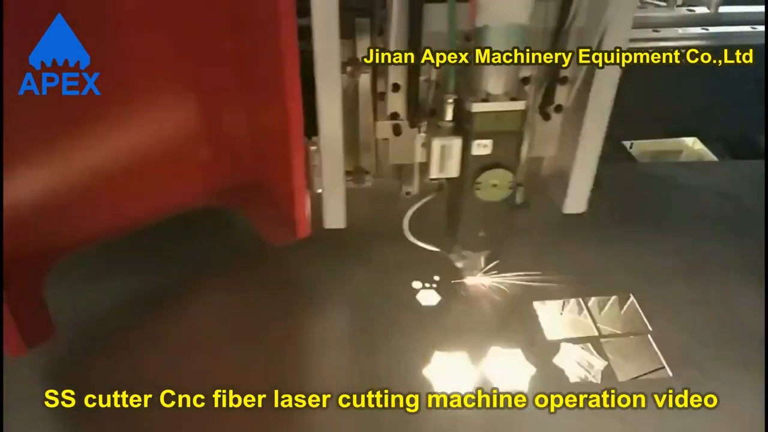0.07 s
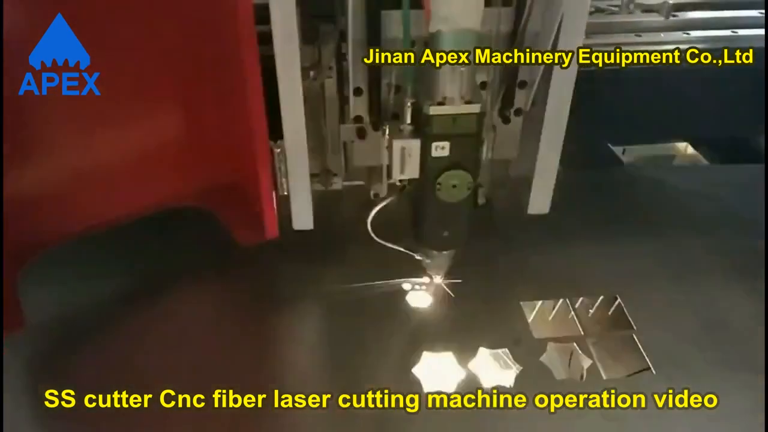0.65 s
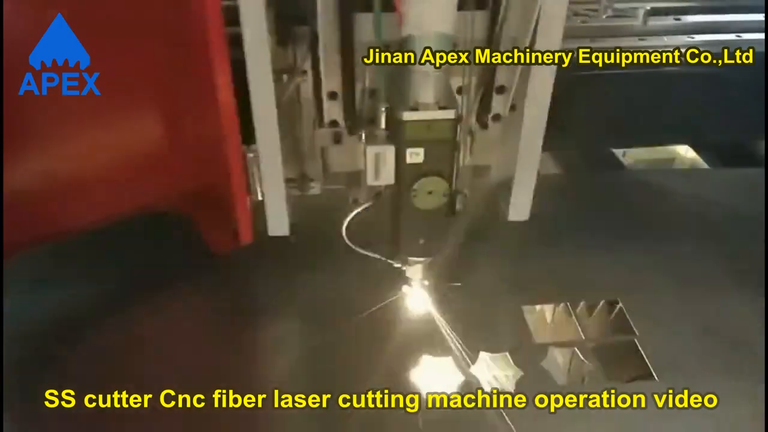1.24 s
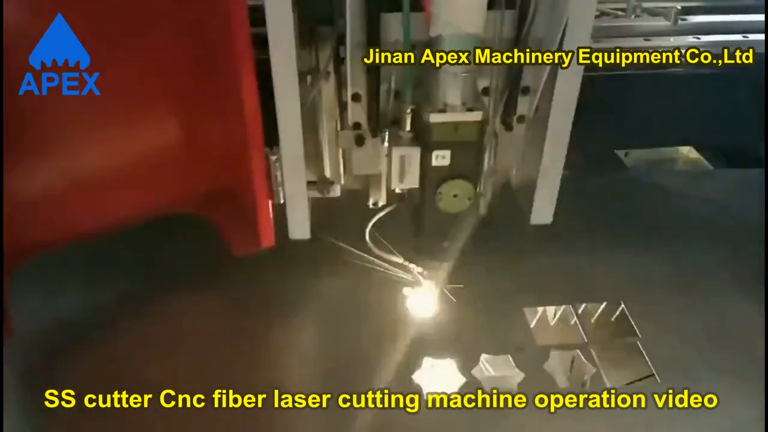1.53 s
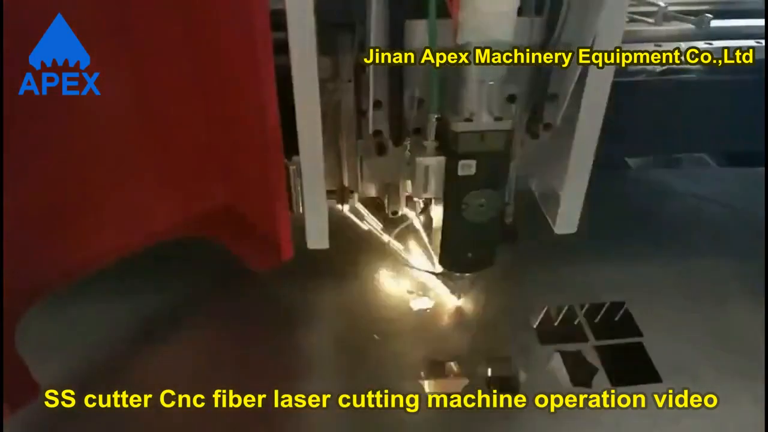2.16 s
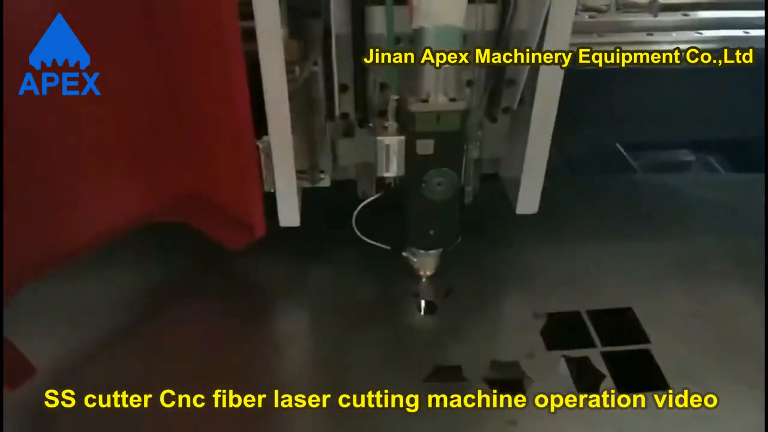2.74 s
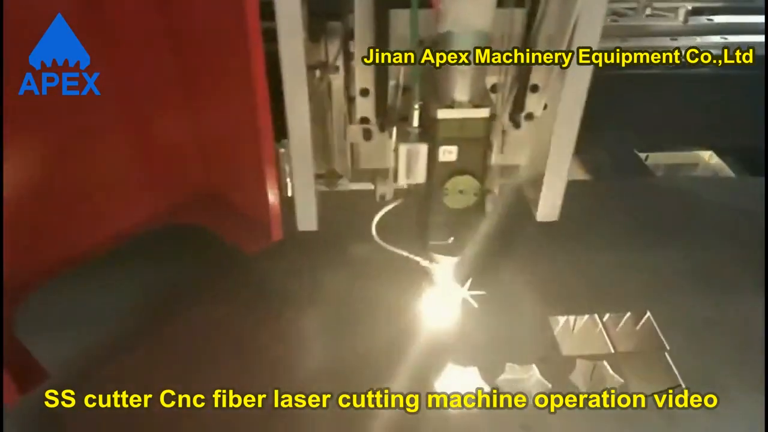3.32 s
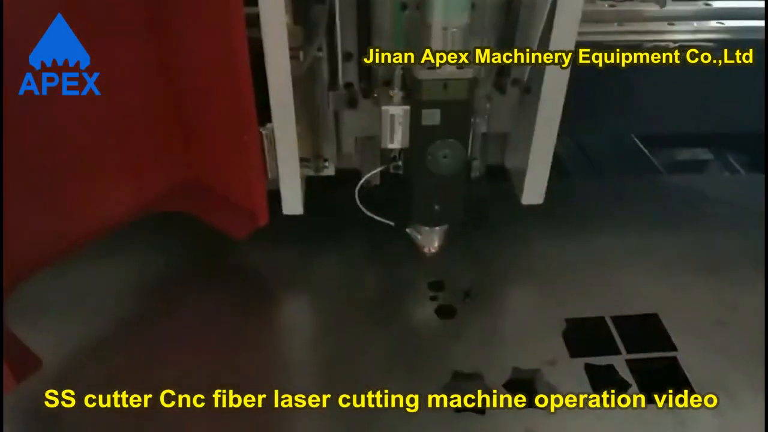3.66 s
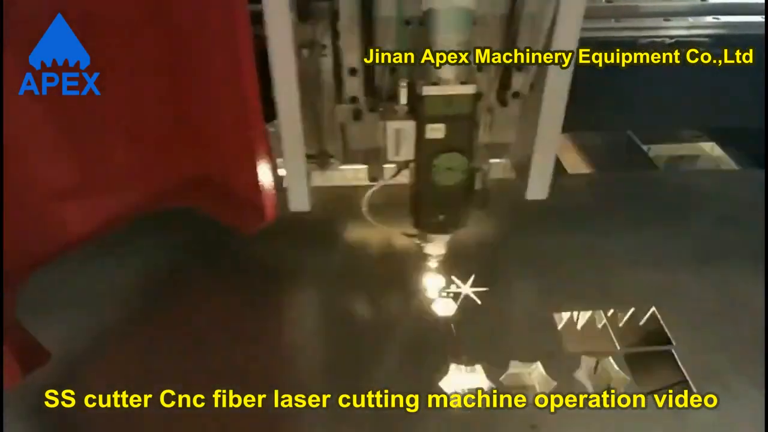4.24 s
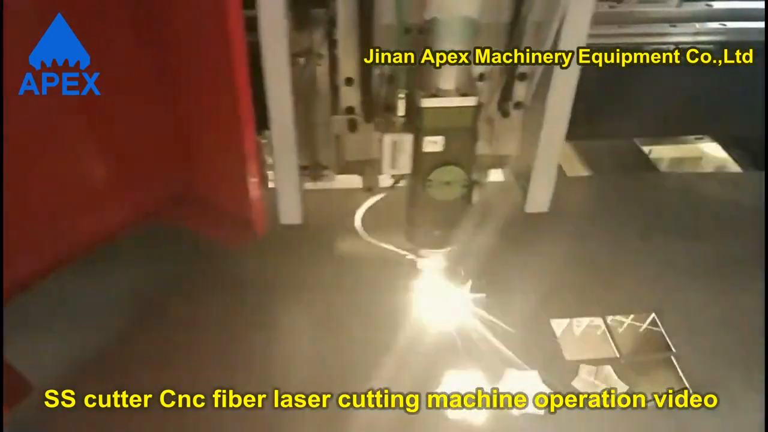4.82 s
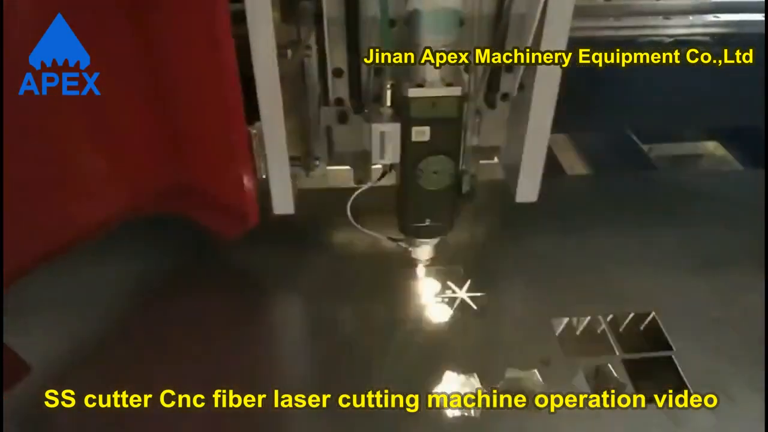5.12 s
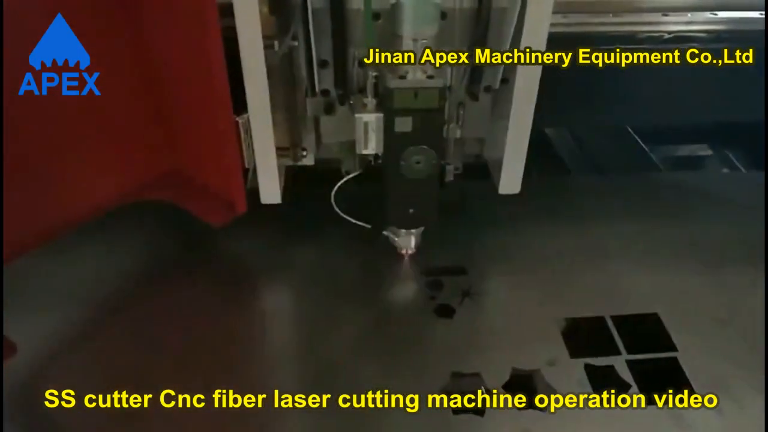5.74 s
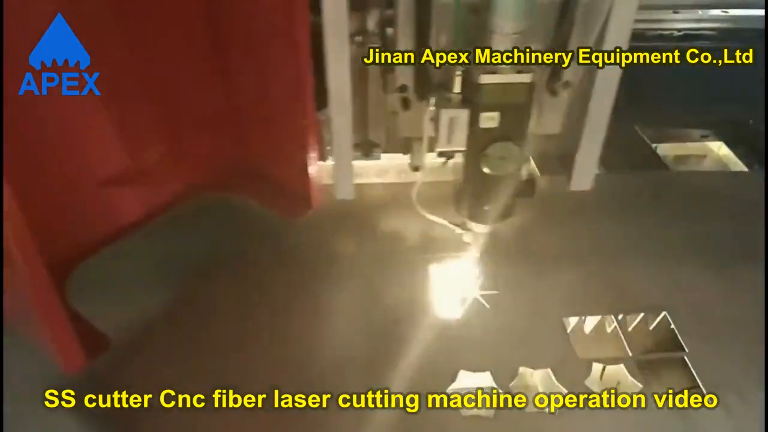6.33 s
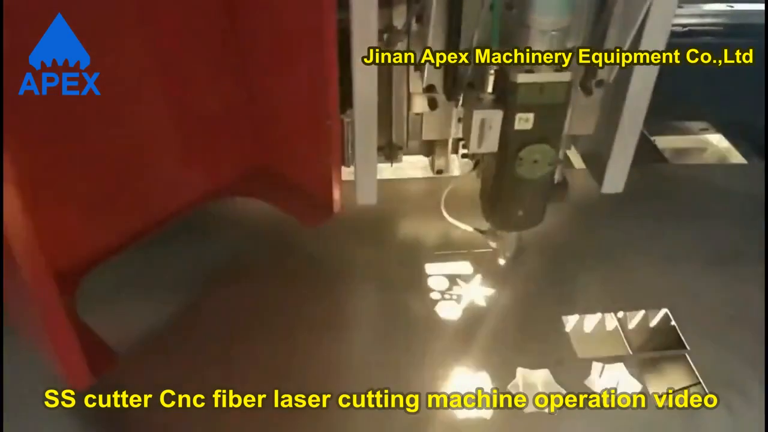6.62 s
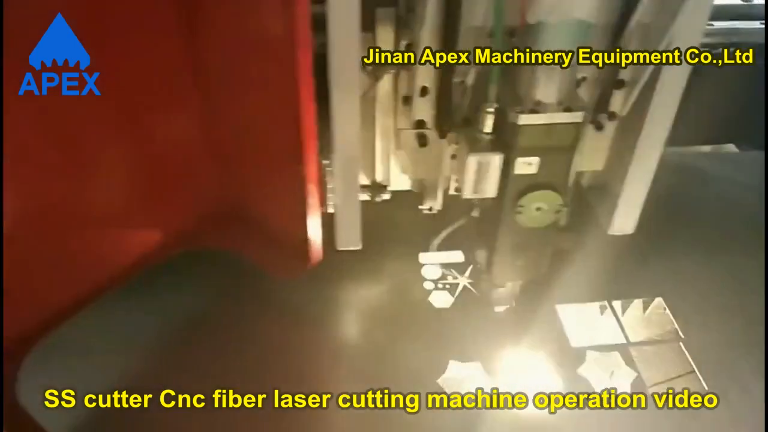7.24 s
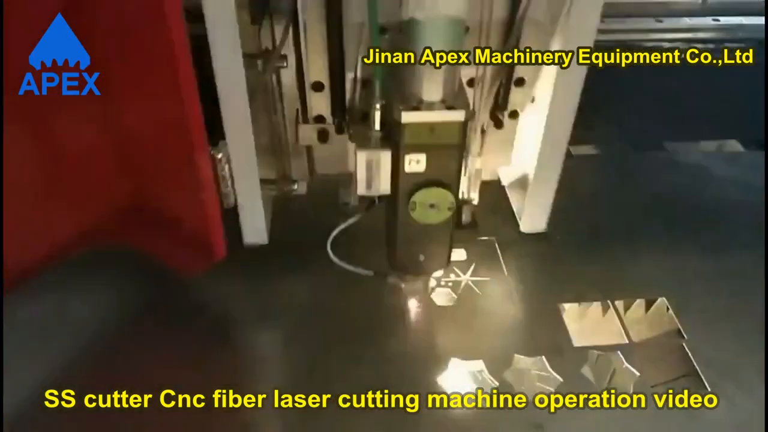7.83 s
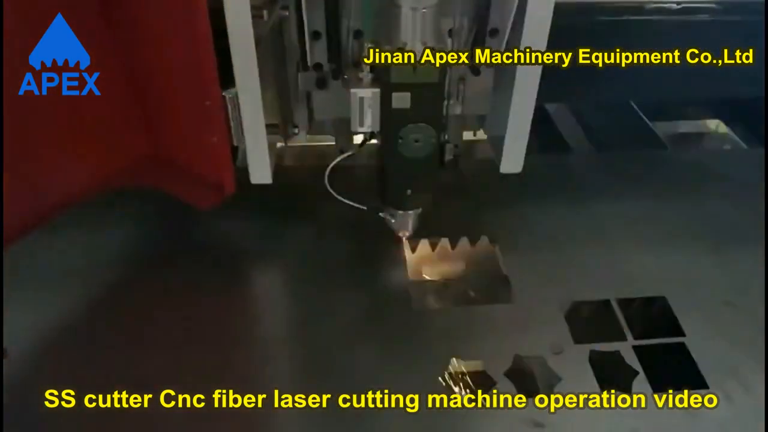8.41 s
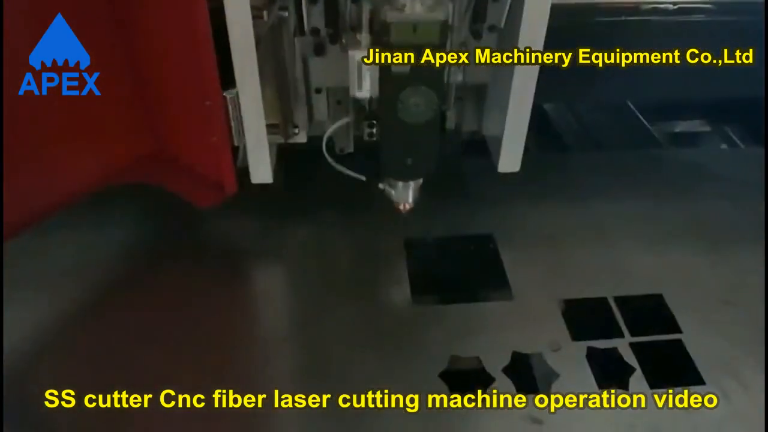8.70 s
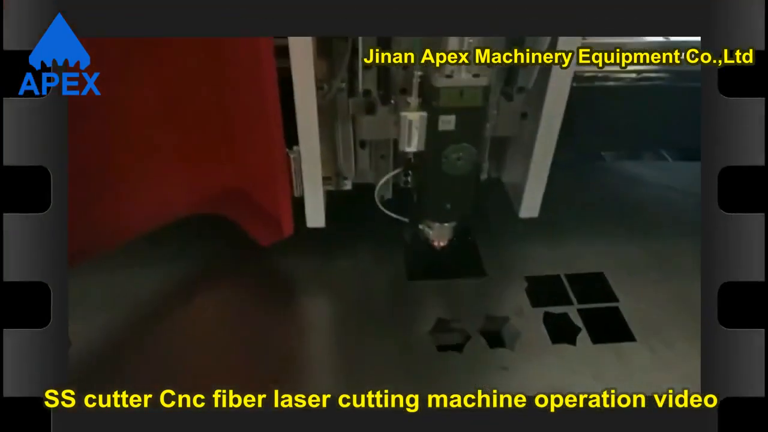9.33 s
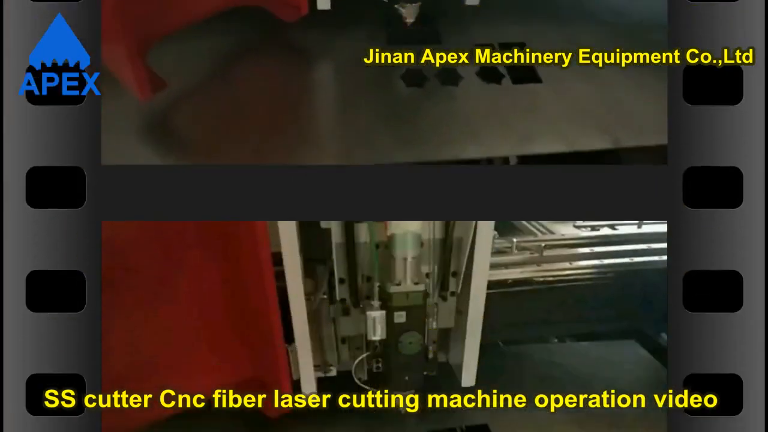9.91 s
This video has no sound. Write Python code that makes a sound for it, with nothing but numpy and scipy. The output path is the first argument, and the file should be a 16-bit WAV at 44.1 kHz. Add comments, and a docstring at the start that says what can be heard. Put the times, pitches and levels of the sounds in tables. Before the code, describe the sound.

Bright, loud gas hiss swells and flutters over a lower roar as a laser cutting machine cuts thin steel, heard close by in a workshop. Thin whistles come and go, along with fine crackle, sharp valve clicks, dull knocks and short squeals over the rumble of the drives. Finally the hiss shuts off with a gush and a few puffs, leaving the rumble and a few small metallic clinks.

```python
"""Hissing, roaring gas with a faint high tone: a fibre laser cuts thin steel sheet, a step away.
Assist gas hisses from the nozzle and roars through the slit into the bed; the pulsed beam sings in it.
Molten drops snap, a valve clicks before new pierces, the gantry rumbles and knocks, the lift axis squeals.
At the end the gas vents in puffs and steel parts clink."""
import sys
import numpy as np
from scipy import signal
from scipy.fft import rfft, irfft
from scipy.io import wavfile
from scipy.ndimage import uniform_filter1d

SR = 44100
rng = np.random.default_rng(int(sys.argv[2]) if len(sys.argv) > 2 else 0)


def generate_wav(sig):
    """Save sig (samples, or channels by samples) to the path in sys.argv[1] as 16-bit PCM at SR."""
    pcm = np.round(np.clip(np.atleast_2d(sig).T, -1, 1) * 32767).astype(np.int16)
    wavfile.write(sys.argv[1], SR, pcm)


N = 439672
FRAME, HOP = 1024, 256
TIME = np.arange(N) / SR
BINS_HZ = np.fft.rfftfreq(FRAME, 1 / SR)
RIPPLE_DB = 3.5  # a fine random ripple drifts slowly over the gas noise spectrum

# stereo images, three curves each: (f/Hz, coherence), (f/Hz, left minus right/dB), (f/Hz, left lead/rad)
HEAD_STEREO = ([(600, 0.23), (2200, 0.26), (3300, 0.102), (4700, 0.59), (5700, 0.34), (7600, 0.15),
               (9300, 0.29), (11000, 0.15), (15000, 0.14)], [(600, -4), (2000, 4), (2900, -11), (4200, -1),
               (5500, -2.5), (6900, -4), (8200, -6.5), (9500, -0.5), (11500, -1.5), (13500, 4.5),
               (15000, -2)], [(600, -1), (2400, -2.5), (3000, -2), (3900, 0.53), (15000, -0.64)])
VENT_STEREO = ([(500, 0.37), (5000, 0.068)], [(600, 16), (3000, -2), (7000, 2.5), (15000, 23)],
               [(500, -0.17), (5000, -1)])
GANTRY_STEREO = ([(60, .2), (150, 0.976), (400, 0.78), (2000, 0.037)], [(60, 13), (140, -12), (280, -11),
                 (520, -5), (2000, 0.5)], [(120, 2.85), (280, 0.72), (450, 1.3), (750, 0.12)])
# jet in the cut: f/Hz, level/dB
JET_SPECTRUM = [(1500, -68), (2900, -41), (4200, -23), (5000, -17), (6200, -9.5), (6900, -5), (8200, -16.5),
                (9200, 3.5), (9900, 0.5), (10400, -15), (11400, -7.5), (12500, -14), (16000, -17.5)]
# gas valve switches: t/s, click/dB, t60/s, gas pause before/s
VALVE_SWITCHES = [(2.616, -14, 0.037, 0.014), (3.928, -12.5, 0.04, 0.0105), (5.648, -13.5, 0.0384, 0.021)]
# cut contours: start/s, end/s, speed-up/s, slow-down/s, jet/dB, roar/dB
CONTOURS = [(-0.06, 0.454, 0.13, 0.075, -23.5, -28), (.32, 1.281, 0.16, 0.1, -20, -29),
            (1.2, 2.358, 0.1065, 0.21, -19.5, -27), (2.572, 3.443, 0.083, 0.44, -24, -27),
            (3.86, 5.31, 0.16, 0.13, -24.5, -29), (5.635, 6.38, 0.41, 0.165, -21, -27),
            (6.515, 7.236, 0.17, 0.14, -27, -30.5), (7.153, 8.62, 0.126, 0.55, -20, -28)]
# the melt flares, the cut blows louder: middle/s, length/s, jet/dB, slit/dB, roar/dB
MELT_FLARES = [(.2, 0.34, -20.5, -20.5, -48), (0.525, 0.17, -28, -22, -30.5), (0.607, 0.126, -17, -31, -36),
               (0.838, 0.14, -33, -21.5, -27), (0.886, .05, -15, -32, -42), (1.061, 0.105, -23.5, -38, -33),
               (1.239, 0.11, -18, -38, -50), (1.635, 0.327, -29, -29, -24.5),
               (2.475, 0.31, -39.5, -37, -33.5), (2.69, 0.14, -21, -27, -32), (2.79, 0.32, -21, -24, -30.5),
               (2.985, 0.27, -36.5, -26, -33), (3.16, 0.39, -16, -30, -48), (3.358, 0.2, -18.5, -37, -26.5),
               (3.512, 0.17, -24, -36, -28), (3.816, 0.29, -43.5, -45, -31.5), (4.437, .14, -36, -32, -44),
               (4.608, 0.38, -19.5, -39, -56), (4.796, 0.29, -21.5, -22.5, -27),
               (6.58, 0.45, -34, -43.5, -52), (7.068, 0.07, -29, -36, -44.5),
               (7.51, 0.212, -35, -30.5, -25.5), (8.443, 0.3, -21.5, -25, -32)]


def amp(db):
    """Decibels to gain."""
    return np.exp(np.asarray(db) * float(np.log(10) / 20))


def unit_rms(x):
    """Scales to rms 1."""
    return x / np.sqrt(np.mean(x ** 2) + 1e-20)


def power_sum(gains):
    """Unrelated flows add in power."""
    return np.sqrt(sum(g ** 2 for g in gains))


def add(mix, s, sound):
    """Mixes a sound in at time s."""
    part = mix[..., int(s * SR):][..., :sound.shape[-1]]
    part += sound[..., :part.shape[-1]]


def curve(points):
    """(f/Hz, value) points interpolated to every bin over log frequency."""
    hz, value = np.transpose(points)
    return np.interp(np.log(BINS_HZ + 1), np.log(hz + 1), value)


def resonance_db(modes):
    """Boost per bin from (f/Hz, width/Hz, level/dB) modes."""
    power = sum(amp(db) ** 2 / (1 + (2 * (BINS_HZ - hz) / width) ** 4) for hz, width, db in modes)
    return 10 * np.log10(1 + power)


def burst(s, t60, rise_s, hold_s=0, size=N):
    """Envelope: quick rise at s, hold, exponential decay."""
    t = np.maximum(TIME[:size] - s, 0)
    return (1 - np.exp(-t / rise_s)) * np.exp(-np.log(1000) * np.maximum(t - hold_s, 0) / t60)


def swell(middle_s, length_s):
    """Rounded envelope, height 1."""
    arch = np.maximum(1 - (2 * (TIME - middle_s) / length_s) ** 2, 0)
    return arch * np.sqrt(arch)


def trapezoid(start_s, end_s, rise_s, fall_s):
    """Envelope with linear ramps, 0 to 1."""
    return np.clip(np.minimum((TIME - start_s) / rise_s, (end_s - TIME) / fall_s), 0, 1)


def wander(hz, size=N):
    """Random drift, rms about 1, rolled off above hz."""
    knots = np.arange(0, N + 200, 100)
    f = np.fft.rfftfreq(len(knots), knots[1] / SR)
    slow = irfft(rfft(rng.standard_normal(len(knots))) / (1 + (f / hz) ** 4), len(knots))
    return np.interp(np.arange(size), knots, unit_rms(slow))


def narrow_noise(phase, width_hz):
    """Noise band around a running phase, rms about 1."""
    return wander(hz=width_hz / 2) * np.cos(phase) + wander(hz=width_hz / 2) * np.sin(phase)


def noise(colour_db, stereo, eddy_db=0, ripple_db=0, size=N):
    """Coloured stereo noise, mid rms 1; eddies thin out patches of the spectrum, a fine ripple drifts."""
    shape = (size // HOP + 5, len(BINS_HZ))
    a, b, c, d, eddies, ripple = rng.standard_normal((6, *shape), dtype=np.float32)
    eddies = unit_rms(uniform_filter1d(uniform_filter1d(eddies, size=18, axis=0), size=4, axis=1))
    ripple = unit_rms(uniform_filter1d(ripple, size=40, axis=0))
    texture = amp(np.minimum(eddy_db * eddies, 1.5) + ripple_db * ripple)
    coherence, balance_db, lead_rad = (curve(points) for points in stereo)
    coherence = np.clip(coherence, -1, 1).astype(np.float32)
    left = a + 1j * b
    right = coherence * left + np.sqrt(1 - coherence ** 2) * (c + 1j * d)
    left_gain = amp(colour_db + balance_db / 2)
    right_gain = amp(colour_db - balance_db / 2) * np.exp(-1j * lead_rad)
    spectra = np.array([left, right]) * np.array([left_gain, right_gain], np.complex64)[:, None] * texture
    x = signal.istft(spectra, nperseg=FRAME, noverlap=FRAME - HOP, time_axis=1, freq_axis=2)[1][:, :size]
    return x / np.sqrt(np.mean(x.mean(0) ** 2))


def gantry():
    """Drives and extractor rumble through the bed; one groan under load on the long straight cut."""
    levels = [(0.0, -29), (.85, -37.5), (1.3, -43.5), (1.55, -40), (1.75, -42.5), (2.12, -33), (2.36, -44),
              (2.52, -34), (3.0, -37.5), (3.25, -44.5), (4.08, -32.5), (4.5, -37.5), (5.45, -38.5),
              (5.8, -33), (6.45, -35), (6.75, -33.5), (7.5, -32.5), (8.22, -28), (8.76, -44.5),
              (8.97, -31.5), (9.97, -39)]  # rumble: t/s, level/dB
    spectrum = [(20, -48), (60, -71), (105, -76), (140, -35.5), (185, 0.5), (290, -1.5), (370, 0),
                (470, -1), (530, -5), (660, 0), (1000, -4.5), (2000, -12.5), (4500, -17), (16000, -31)]  # f/Hz, level/dB
    groan = (7.568, -26.5, 0.83)  # t/s, level/dB, t60/s
    groan_modes = [(230, 34.5, 11), (311, 62, 16), (473, 44, 20.5)]  # f/Hz, width/Hz, level/dB
    bed_tone = (466, -32, 0.5, 0.25)  # rings with the groan: f/Hz, level/dB, t60/s, hold/s
    level_db = np.interp(TIME, *np.transpose(levels)) - 1.5 + 0.79 * wander(hz=8.9)
    out = amp(level_db) * noise(curve(spectrum), GANTRY_STEREO, eddy_db=2.5, ripple_db=1.8)
    s, db, t60 = groan
    strain = noise(curve(spectrum) + resonance_db(groan_modes), GANTRY_STEREO, size=SR)
    add(out, s, amp(db) * burst(0, t60, rise_s=0.0099, hold_s=0.087, size=SR) * strain)
    hz, db, t60, hold_s = bed_tone
    tone = np.sin(2 * np.pi * hz * TIME[:SR] + .8 * wander(hz=30, size=SR) + np.array([[1.3], [0]]))
    add(out, s, amp([[db + 2], [db - 2]]) * burst(0, t60, rise_s=.012, hold_s=hold_s, size=SR) * tone)
    return out


def knocks():
    """Carriage and sheet knock, exciting a broad hump of crowded modes; the bed booms as the gantry stops."""
    contacts = [(.577, -25, .1, 600), (.598, -26, 0.091, 650), (.617, -30, .05, 500),
                (1.491, -28, .08, 480), (1.507, -29, .1, 450), (1.538, -36, .05, 450),
                (2.056, -32, .08, 545), (2.21, -29, .06, 550), (2.226, -31, .06, 330),
                (2.249, -23.5, .09, 750), (2.266, -24.5, 0.075, 450), (2.281, -30.5, 0.063, 600),
                (3.377, -27.5, 0.041, 900), (3.479, -33, .1, 1200), (3.532, -32, .05, 900),
                (3.56, -25.5, .06, 500), (3.587, -28.5, .06, 400), (5.285, -25, 0.067, 550),
                (5.305, -25.5, 0.061, 480), (5.32, -31, .05, 400), (5.334, -28, .05, 330),
                (5.474, -34, .04, 500), (6.567, -37, 0.098, 400), (7.575, -27, .14, 480),
                (8.47, -26, .5, 800), (8.808, -29, .035, 600), (9.255, -36, 0.5, 650)]  # t/s, level/dB, t60/s, centre/Hz
    booms = [(8.889, -26, 212, .2), (9.112, -33, 195, .12), (9.2, -36.5, 190, .07)]  # t/s, level/dB, f/Hz, t60/s
    out, size = np.zeros((2, N)), SR // 2
    for s, db, t60, hz in contacts:
        hump_db = -20 * np.log10(1 + (np.log2((BINS_HZ + 1) / hz) / 1.63) ** 2) - BINS_HZ / 900
        ring = noise(hump_db, GANTRY_STEREO, eddy_db=3, size=size)
        add(out, s, amp(db) * ring * burst(0, t60, rise_s=0.00078, hold_s=.006, size=size))
    out *= amp(1.2 * wander(hz=90))  # loose parts chatter
    for s, db, hz, t60 in booms:
        boom = burst(0, t60, rise_s=.008, hold_s=.015, size=size) * np.sin(2 * np.pi * hz * TIME[:size])
        add(out, s, amp([[db - 4], [db + 3]]) * boom)
    return signal.sosfilt(signal.butter(4, 175, "high", fs=SR, output="sos"), out)


def lift_axis():
    """Short, rough squeals as the head rises or sinks, slightly right."""
    squeals = [(3.396, 0.12, 6990, -25.5), (3.396, 0.06, 7190, -26), (3.402, 0.13, 2880, -33),
               (3.74, 0.42, 2360, -45), (3.79, 0.13, 2550, -41), (5.68, 0.14, 2850, -40),
               (8.41, 0.14, 7050, -26.5), (9.0, 0.41, 2170, -45.5)]  # t/s, length/s, f/Hz, level/dB
    out, t = np.zeros((2, N)), TIME[:SR]
    for s, length, hz, db in squeals:
        arch = np.sqrt(np.sin(np.pi * np.clip(t / length, 0, 1)).clip(0))
        scrape = np.sin(2 * np.pi * hz * t + .9 * wander(hz=90, size=SR))
        add(out, s, amp([[-3], [2]]) * amp(db + 3.5 * wander(hz=90, size=SR)) * arch * scrape)
    return out


def clinks():
    """Steel parts touch: a tick, a sizzle of dense modes, and a few rattling, beating pairs, slightly left."""
    contacts = [(9.277, -28.5, -29, -4), (9.785, -28.5, -35, 7.5), (9.868, -32, -41, 7.5)]  # t/s, ring/dB, sizzle/dB, tilt/(dB/octave)
    steel_modes = [(660, -13, 0.44, -.4), (1900, -16, .6, -.5), (2270, -9, .45, -2),
                   (2280, -11.5, 2.37, -1.2), (4005, -18.5, .25, -1.5), (4345, -11, 1.5, -.8),
                   (4367, 0, 0.46, -1.86), (5115, -9, 0.65, -0.14), (6420, -22, .4, .5),
                   (7260, -19, .3, .6), (9620, -23.5, 0.43, 0), (10060, -20, .45, -1)]  # f/Hz, level/dB, t60/s, left lead/rad
    sizzle_spectrum = [(1000, -19), (2000, 4.5), (3000, -3.5), (4400, -4), (5200, -0.5), (6400, 0.5),
                       (7600, -0.5), (9300, 0), (10200, -1), (10900, -12.5), (16000, -28)]  # f/Hz, level/dB
    out, t = np.zeros((2, N)), TIME[:SR]
    attack, pan = 1 - np.exp(-t / 0.003), amp([[3], [-3]])
    for s, ring_db, sizzle_db, tilt_db in contacts:
        sizzle = amp(sizzle_db) * burst(0, .8, rise_s=.011, hold_s=.016, size=SR)
        tick = amp(ring_db - 4) * burst(0, 0.019, rise_s=.0004, hold_s=.002, size=SR)
        dense_modes = noise(curve(sizzle_spectrum), VENT_STEREO, eddy_db=2.5, ripple_db=3, size=SR)
        add(out, s, (tick + sizzle) * dense_modes)
        for hz, db, t60, lead_rad in steel_modes:
            phase = 2 * np.pi * rng.random() + np.array([[lead_rad], [0]]) + .45 * wander(hz=70, size=SR)
            twin_hz = hz + rng.uniform(-25, 25)
            pair = np.sin(2 * np.pi * hz * t + phase) + .4 * np.sin(2 * np.pi * twin_hz * t + phase)
            rattle_db = 3 * wander(hz=60, size=SR)
            level_db = ring_db + db + tilt_db * np.log2(hz / 4400) + rattle_db - 60 * t / t60
            add(out, s, amp(level_db) * attack * pair * pan)
    return out


def puff_flow():
    """Envelope of the last puffs as the line empties."""
    puffs = [(8.916, -23, 0.28, 0.0297), (8.987, -26, 0.5, 0.067), (9.06, -34.5, 0.35, .015)]  # t/s, level/dB, t60/s, hold/s
    return sum(amp(db) * burst(s, t60, rise_s=0.0059, hold_s=hold_s) for s, db, t60, hold_s in puffs)


def venting(puffs):
    """Gas fans out as the nozzle lifts clear or passes a hole; the last puffs ring the vent."""
    gushes = [(.41, 0.19, -28), (1.64, .2, -29), (2.51, 0.32, -34), (3.48, .13, -28), (3.8, .26, -40),
              (4.78, .17, -28), (3.99, .12, -30), (5.73, 0.18, -29.5), (8.77, 0.22, -19.5)]  # middle/s, length/s, level/dB
    room_tail = (8.83, -21.5, 0.44)  # last gush dying away: t/s, level/dB, t60/s
    gush_spectrum = [(500, -27.5), (1200, -5), (1900, 5), (2350, 5), (2950, 9.5), (3500, 2.5), (4200, 2),
                     (5300, 11.5), (6300, 0), (7600, 5), (9700, -14), (11400, 4.5), (12500, -23),
                     (16000, -15)]  # f/Hz, level/dB
    vent_spectrum = [(1000, -30), (2000, -29), (3200, -29), (4200, -17), (4800, 9), (5600, 5), (6400, -6),
                     (7500, 1), (8300, 0.5), (9300, 5), (10200, -5), (11500, -2.5), (12500, -19),
                     (16000, -22)]  # f/Hz, level/dB
    vent_modes = [(4986, 42, 9.5), (5760, 120, 6), (7400, 80, 10), (7620, 45, 14), (8900, 45, 9),
                  (9470, 50, 8)]  # f/Hz, width/Hz, level/dB
    tail_s, tail_db, t60 = room_tail
    tail = amp(tail_db) * burst(tail_s, t60, rise_s=.01)
    flow = power_sum([amp(db) * swell(s, length) for s, length, db in gushes] + [tail])
    gush = flow * noise(curve(gush_spectrum), VENT_STEREO, eddy_db=9, ripple_db=RIPPLE_DB)
    vent_db = curve(vent_spectrum) + resonance_db(vent_modes)
    return gush + puffs * noise(vent_db, VENT_STEREO, eddy_db=4, ripple_db=3.5)


def spatter(jet):
    """Molten drops snap in the jet: a few loud ones over a fine crackle that follows the cut."""
    loud_snaps = [(1.2492, -20), (1.618, -17), (2.335, -19), (3.2756, -20), (3.9016, -21), (5.1034, -16),
                  (5.1135, -14.5), (5.6215, -16)]  # t/s, level/dB
    rate_hz, decay_s, last_cut_end_s = 45, .0007, CONTOURS[-1][1]
    sizes = np.minimum(rng.exponential(1, N), 3)
    pops = (rng.random(N) < rate_hz / SR) * amp(-3 + 1.5 * sizes) * jet * (TIME < last_cut_end_s)
    for s, db in loud_snaps:
        pops[int(s * SR)] += amp(db)
    snap = np.exp(-np.arange(400) / SR / decay_s)
    return signal.oaconvolve(pops, snap)[:N] * noise(curve(JET_SPECTRUM), HEAD_STEREO)


def valve():
    """A sharp click and a short spurt each time the gas comes back."""
    spectrum = [(300, -20), (1500, 3), (2700, 5.5), (3600, 0), (5500, 3.5), (7300, 12), (9500, 12),
                (11500, -4), (16000, -33)]  # f/Hz, level/dB
    out, size = np.zeros((2, N)), SR // 4
    for s, db, t60, _ in VALVE_SWITCHES:
        click = burst(0, t60, rise_s=0.00029, size=size)
        spurt = 0.51 * burst(0, 0.094, rise_s=0.004, size=size)
        add(out, s, amp(db) * (click + spurt) * noise(curve(spectrum), HEAD_STEREO, eddy_db=12, size=size))
    return out


def beam():
    """Each laser pulse puffs vapour: a faint tone, roughened by the gas, breaking into short whistles."""
    runs = [(.05, 2.07, -42, -33.5, -46), (2.842, 3.36, -37, -34, -42), (4.13, 5.09, -36, -30.5, -40),
            (5.87, 7.42, -39, -34.5, -37), (7.42, 8.3, -43, -36, -41)]  # start/s, end/s, levels of harmonics 1, 2, 3/dB
    whistles = [(0.81, 0.89, 1, -30), (1.97, 2.025, 1, -26.5), (2.87, 3.15, 2, -28), (2.89, 3.07, 3, -34),
                (4.17, 4.23, 1, -30), (4.16, 4.27, 2, -28), (4.385, 4.48, 1, -25), (4.46, 4.585, 1, -27),
                (4.36, 4.47, 2, -27.5), (4.83, 5.06, 2, -22), (4.8, 5.12, 1, -31), (5.88, 6.05, 2, -32),
                (6.08, 6.27, 2, -29.5), (6.33, 6.45, 3, -29.5), (6.415, 6.5, 1, -23),
                (6.665, 6.735, 2, -27), (6.76, 6.89, 2, -28), (7.025, 7.085, 2, -21), (7.03, 7.09, 1, -26),
                (7.12, 7.26, 2, -26.5), (7.765, 7.835, 1, -28), (8.265, 8.325, 2, -24.5),
                (8.28, 8.345, 1, -24)]  # start/s, end/s, harmonic, level/dB
    pulse_hz, run_ramp_s, whistle_ramp_s = 5000, .04, .022
    phase = 2 * np.pi * pulse_hz * TIME + .4 * wander(hz=5)
    gates = [(trapezoid(start, end, run_ramp_s, run_ramp_s), db) for start, end, *db in runs]
    out = np.zeros((2, N))
    for k in (1, 2, 3):
        singing = sum(gate * amp(db[k - 1]) for gate, db in gates) * amp(2.5 * wander(hz=11))
        whistling = sum(amp(db) * trapezoid(start, end, whistle_ramp_s, whistle_ramp_s)
                        for start, end, harmonic, db in whistles if harmonic == k)
        level = power_sum([singing, whistling])
        for channel in range(2):
            tone = amp(1.5 * wander(hz=35)) * np.sin(k * phase + .4 * wander(hz=14))
            rasp = .4 / k * narrow_noise(k * phase, width_hz=200)
            out[channel] += level * unit_rms(unit_rms(tone) + rasp)
    return out


def slit_voice():
    """Gas in the slit: noise plus resonances that drift with its shape and sputter as melt blocks it."""
    spectrum = [(1500, -34), (2000, -19), (2900, -11.5), (4150, -9.5), (4600, -3), (4950, -1), (5620, 0),
                (6200, -9), (6800, -8), (7800, -8), (16000, -41)]  # f/Hz, level/dB
    resonances = [(4790, -12), (5130, -9.5), (5480, -12)]  # f/Hz, level re the slit noise/dB
    out = noise(curve(spectrum), HEAD_STEREO, eddy_db=2.5, ripple_db=RIPPLE_DB)
    for hz, db in resonances:
        phase = 2 * np.pi * np.cumsum(hz * (1 + .018 * wander(hz=4))) / SR
        sputter = unit_rms(amp(4.5 * np.minimum(wander(hz=18), 1.5)))
        out = out + amp(db) * sputter * narrow_noise(phase, width_hz=70)
    return out


def housing_echoes(x):
    """Short echoes off sheet and housing; each channel's paths drift as the head moves."""
    delay_range = (.0006, .0028)  # shortest/s, longest/s
    delays_s = np.geomspace(*delay_range, num=6)
    out, gain = x.copy(), amp(-17)
    for channel in range(2):
        for delay_s in delays_s:
            path_s = delay_s * rng.uniform(.85, 1.15) + .00004 * wander(hz=2)
            out[channel] += gain * np.interp(TIME - path_s, TIME, x[channel])
    return out / np.sqrt(1 + len(delays_s) * gain ** 2 / 2)


def gas_flows():
    """Envelopes of hiss, free blast, jet and roar: an idle stream plus cuts, flares and nozzle lifts."""
    lifts = [(2.272, 0.26, -21, -18), (3.56, 0.46, -23.5, -29.5), (5.263, 0.46, -23.5, -26),
             (8.664, 0.27, -25.5, -17), (8.819, 0.06, -20.5, -17), (8.867, 0.126, -34, -28)]  # nozzle off the sheet: middle/s, length/s, blast/dB, jet/dB
    hiss_db, idle_jet_db, idle_roar_db = -27, -29.5, -34.5
    shutoff_s, drain_db_per_s, bed_fade_db_per_s = 8.8, 67, 57
    draining_s = np.maximum(TIME - shutoff_s, 0)
    sag_db = -2 * sum(swell(s - 0.12, 0.15) for s, *_ in VALVE_SWITCHES)
    pressure = amp(sag_db - drain_db_per_s * draining_s)
    blast, jet = [], [amp(idle_jet_db) * pressure]
    roar = [amp(idle_roar_db - bed_fade_db_per_s * draining_s)]
    burns = [(trapezoid(*timing), jet_db, roar_db) for *timing, jet_db, roar_db in CONTOURS]
    burns += [(swell(s, length), jet_db, roar_db) for s, length, jet_db, _, roar_db in MELT_FLARES]
    for shape, jet_db, roar_db in burns:
        jet.append(amp(jet_db) * shape)
        roar.append(amp(roar_db) * shape)
    for s, length, blast_db, jet_db in lifts:
        shape = swell(s, length)
        blast.append(amp(blast_db) * shape)
        jet.append(amp(jet_db) * shape)
    return amp(hiss_db) * pressure, power_sum(blast), power_sum(jet), power_sum(roar)


def assist_gas(hiss, blast, jet, roar):
    """The nozzle hisses and blasts; jet, slit and the roar in the bed flutter as melt is blown out."""
    hiss_spectrum = [(200, -34), (650, -14), (1200, -14), (2800, -4.5), (4100, -2), (4900, -32), (6000, -7),
                     (7100, 10), (8200, 7.5), (9400, 15), (11900, 6.5), (13400, 9.5), (14600, 9.5),
                     (15800, 3.5)]  # f/Hz, level/dB
    blast_spectrum = [(500, -24), (1200, -17), (2800, 3.5), (4100, -0.5), (6000, -18), (7500, 9.5),
                      (9400, 13), (11500, 9), (13400, 10.5), (15800, 1)]  # f/Hz, level/dB
    roar_spectrum = [(130, -65), (250, -16.5), (520, -20), (620, -8.5), (880, -4), (1200, -3.5), (1700, -5),
                     (2200, -4), (3000, -9), (4200, -17), (9000, -58)]  # f/Hz, level/dB
    bed_modes = [(452, 31, 7.5), (623, 36, 12), (1017.8, 30, 12), (1142, 30.7, 12.5), (1253, 79, 9),
                 (1508, 17, 8), (1660.6, 55, 9.5), (1840, 98, 6), (2036, 226, -0.5), (2890, 20, 6)]  # slatted bed: f/Hz, width/Hz, level/dB
    blast_stereo = ([(600, 0.25), (15000, 0.17)], [(600, 14), (2800, 10.5), (6000, -5), (9500, -4),
                    (15000, 2)], [(600, 0), (15000, 0.35)])  # columns as HEAD_STEREO
    bed_stereo = ([(400, 1), (1250, 0.77), (2000, 0.96), (3000, 0.094)], [(500, -9.5), (1200, -7.5),
                  (1850, -9), (2300, -4.5), (2900, -12)], [(470, 0.34), (750, 0.07), (1020, 0.89),
                  (1300, 0.14), (1650, 1), (2400, 0)])  # columns as HEAD_STEREO
    flutter = wander(hz=21.4)
    hiss = hiss * amp(.7 * wander(hz=25))
    nozzle = hiss * noise(curve(hiss_spectrum), HEAD_STEREO, eddy_db=7, ripple_db=RIPPLE_DB)
    nozzle += blast * noise(curve(blast_spectrum), blast_stereo, eddy_db=7, ripple_db=RIPPLE_DB)
    jet_noise = noise(curve(JET_SPECTRUM), HEAD_STEREO, eddy_db=0.5, ripple_db=RIPPLE_DB)
    cut = jet * amp(-3.5 + 0.59 * flutter) * jet_noise
    through_flow = np.sqrt(jet * roar)  # the slit sings when a strong jet passes right through
    flares = [amp(slit_db) * swell(s, length) for s, length, _, slit_db, _ in MELT_FLARES]
    cut += power_sum([through_flow] + flares) * amp(-3.4 + 0.75 * flutter) * slit_voice()
    out = housing_echoes(nozzle + cut)
    bed_noise = noise(curve(roar_spectrum) + resonance_db(bed_modes), bed_stereo, eddy_db=2, ripple_db=2.5)
    out += roar * amp(-1 + flutter) * bed_noise
    valve_moving = sum((TIME > s - pause) & (TIME < s + .008) for s, _, _, pause in VALVE_SWITCHES)
    return out * amp(-10 * uniform_filter1d(valve_moving * 1., size=150))


def scene():
    """The whole machine, in stereo."""
    hiss, blast, jet, roar = gas_flows()
    puffs = puff_flow()
    hiss = power_sum([hiss, amp(-0.5) * puffs])  # part of each puff leaves by the nozzle
    cutting = assist_gas(hiss, blast, jet, roar) + beam() + valve() + spatter(jet)
    return cutting + gantry() + knocks() + lift_axis() + venting(puffs) + clinks()


def record(dry):
    """Low cut at 90 Hz, steep band limit at 15.9 kHz."""
    thin = signal.sosfilt(signal.butter(2, 90, "high", fs=SR, output="sos"), dry)
    return signal.oaconvolve(thin, signal.firwin(401, 15900, window=("kaiser", 9), fs=SR)[None], "same")


dry = scene()
out = record(dry)
generate_wav(out)
```